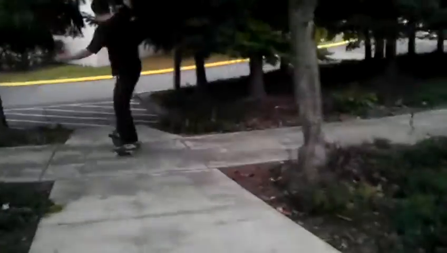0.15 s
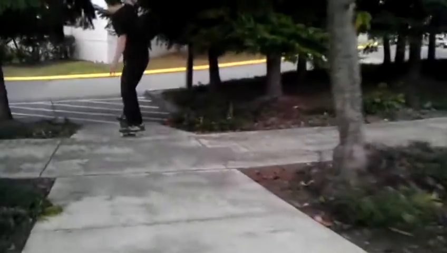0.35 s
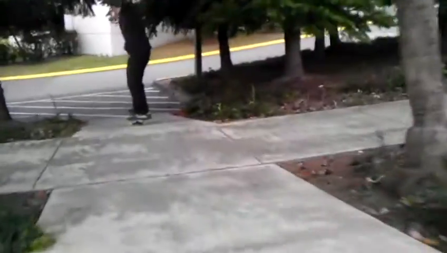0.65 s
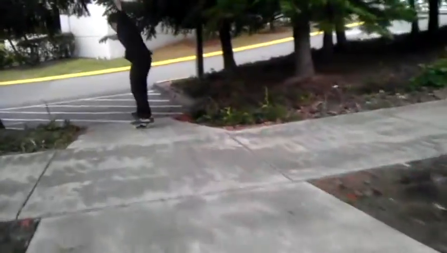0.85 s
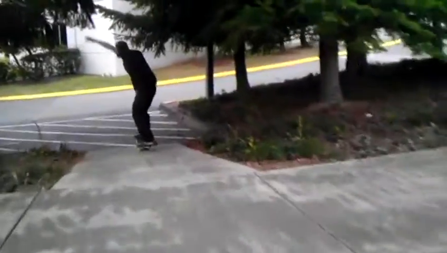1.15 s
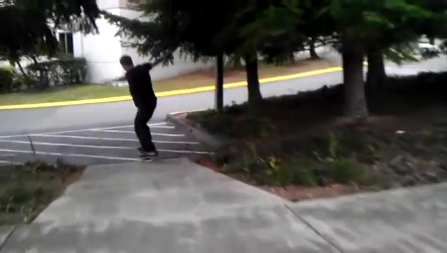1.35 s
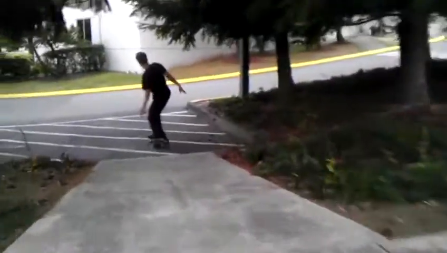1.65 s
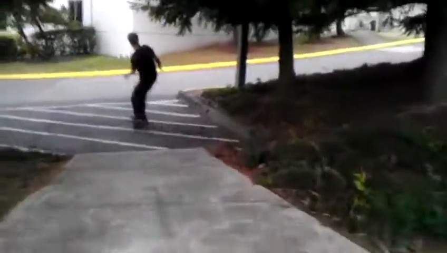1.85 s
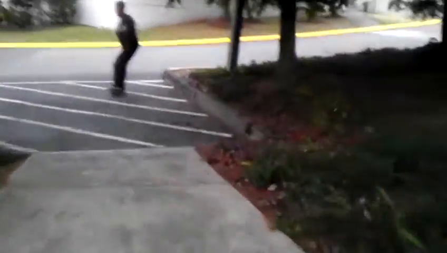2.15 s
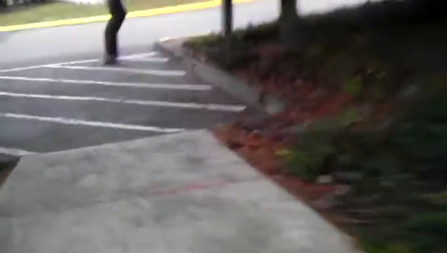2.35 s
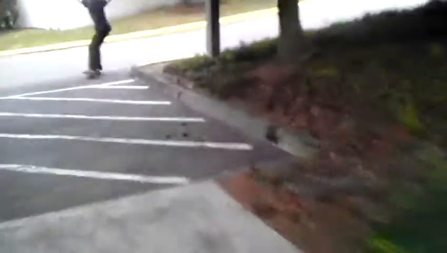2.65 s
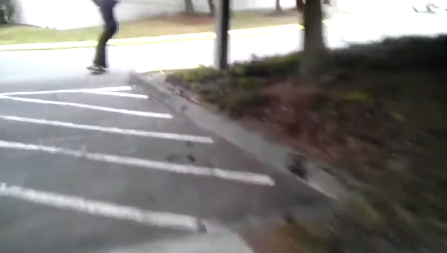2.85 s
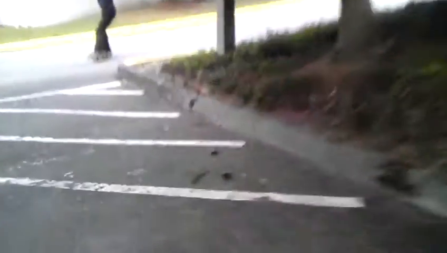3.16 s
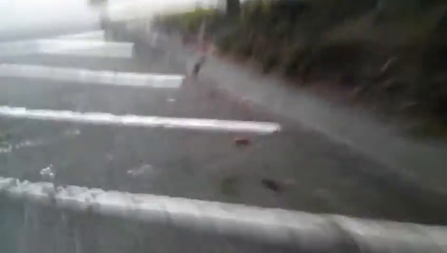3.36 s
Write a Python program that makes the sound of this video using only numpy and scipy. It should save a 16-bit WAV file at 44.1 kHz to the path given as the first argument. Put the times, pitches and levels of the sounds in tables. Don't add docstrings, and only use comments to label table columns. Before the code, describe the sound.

A skateboard rattles and hisses along concrete outdoors, with loud distorted clacks at each joint.

```python
import sys
import numpy as np
from scipy import signal
from scipy.fft import rfft, irfft
from scipy.io import wavfile
from scipy.ndimage import uniform_filter1d

SR = 44100
rng = np.random.default_rng(int(sys.argv[2]) if len(sys.argv) > 2 else 0)


def wav_out(sig):
    wavfile.write(sys.argv[1], SR, np.round(np.clip(np.atleast_2d(sig).T, -1, 1) * 32767).astype(np.int16))


def field_ratio(decibels):
    return 10 ** (np.asarray(decibels, dtype=float) / 20)


N = 154350

# f/Hz, width/Hz, level/dB
DECK_MODES = [(209, 90, -11), (339.6, 76, -7), (549, 50.6, 0), (690.4, 136.5, 3.5), (718.6, 156.5, 2.5),
              (947, 99, -7.5), (1263, 176, -13.5)]
# f/Hz, width/Hz, level/dB
WHEEL_MODES = [(2370, 130, 10), (3350, 560, 7), (4660, 1430, 2.5), (6700, 3900, -9.5), (11900, 3000, -25)]


def evened(x):
    return x / np.sqrt(np.mean(x ** 2) + 1e-20)


def read(points, hz):
    f, value = np.transpose(points)
    return np.interp(np.log(hz + 1), np.log(f + 1), value)


def curve(rows, column):
    rows = np.array(rows)
    return np.interp(np.arange(N) / SR, rows[:, 0], rows[:, column])


def add(mix, s, sound):
    part = mix[round(s * SR):][:len(sound)]
    part += sound[:len(part)]


def colour(x, points):
    gain = field_ratio(read(points, np.fft.rfftfreq(len(x), 1 / SR)))
    return irfft(rfft(x) * gain, len(x))


def ring(x, modes):
    out = 0
    for k, (hz, width, db) in enumerate(modes):
        r = np.exp(-np.pi * width / SR)
        poles = [1, -2 * r * np.cos(2 * np.pi * hz / SR), r * r]
        out = out + (-1) ** k * field_ratio(db) * (1 - r) * signal.lfilter([1, 0, -1], poles, x)
    return out


def wander(seconds):
    width = max(int(seconds * SR), 2)
    once = uniform_filter1d(rng.standard_normal(N), width)
    return evened(uniform_filter1d(once, width))


def grit(per_s, spread_db, smooth):
    size = field_ratio(spread_db * np.minimum(rng.exponential(1, N), 4))
    struck = rng.random(N) < per_s / SR
    taps = size * struck * rng.choice([-1., 1.], N)
    return evened(taps) + smooth * rng.standard_normal(N)


def hum(x, width, db):
    # t/s, f/Hz
    flex = [(0, 534), (.3, 567), (.7, 529), (1.0, 544), (1.3, 574), (1.55, 508), (1.75, 546), (2.1, 505),
            (2.5, 543), (3.0, 540), (3.3, 538), (3.45, 650), (3.5, 625)]
    hz = curve(flex, 1) * (1 + .03 * wander(.02))
    turn = np.exp(2j * np.pi * np.cumsum(hz) / SR)
    r = np.exp(-np.pi * width / SR)
    swing = turn * signal.lfilter([1 - r], [1, -r], x / turn)
    return field_ratio(db + wander(0.09)) * 2 * swing.real


def rolling(lumps):
    # t/s, level/dB
    load = [(0, -19), (.2, -23), (.445, -17), (.47, -15), (.62, -18), (.78, -16.5), (1.0, -20),
            (1.18, -17.5), (1.3, -20), (1.6, -18.5), (1.78, -22.5), (1.88, -29.5), (2.2, -24.5),
            (2.36, -22), (2.66, -17), (3.0, -18.5), (3.3, -13.5), (3.5, -24)]
    # t/s, sharpness/dB, finest share/dB
    sand = [(0, 3, 0), (.3, -2, 3), (.44, -7, -6), (.46, -4.5, -20), (.75, -1.5, 8.5), (1.0, -3, 2),
            (1.24, -9.5, -34), (1.3, -4.5, -16), (1.75, -1, 0), (1.9, 7, 3), (2.16, -6.5, -28),
            (2.21, -6, -37), (2.26, 2.5, -6), (2.6, -1, 6), (2.88, 3.5, -12), (3.06, 5, -6),
            (3.2, -4.5, -1), (3.5, 1, 12.5)]
    taps = grit(per_s=1500, spread_db=2.0, smooth=0.63) * field_ratio(lumps)
    main_mode = hum(taps, *DECK_MODES[2][1:])
    deck = evened(ring(taps, DECK_MODES[:2]) + main_mode - ring(taps, DECK_MODES[3:]))

    flicker_db = .6 * lumps + 1.8 * wander(.02)
    rub = .5 * taps + 5.4 * grit(per_s=3300, spread_db=4.0, smooth=0.43) * field_ratio(flicker_db)
    patchy_db = 1.5 * wander(.04)
    hiss = 0
    for k, mode in enumerate(WHEEL_MODES[:3]):
        hiss = hiss + (-1) ** k * ring(rub, [mode]) * field_ratio(2.74 * wander(0.04))
    hiss = hiss + ring(rub, WHEEL_MODES[3:]) * field_ratio(curve(sand, 2) + patchy_db)
    return field_ratio(curve(load, 1) + 4.5) * (deck + evened(hiss) * field_ratio(-14 + curve(sand, 1)))


def far_board(lumps):
    # t/s, level/dB
    far_level = [(0, -28), (.12, -39), (.45, -36), (.75, -35.5), (1.06, -38), (1.3, -37), (1.75, -37.5),
                 (1.88, -21), (2.0, -27), (2.2, -29), (2.45, -30.5), (2.64, -23.5), (2.73, -19),
                 (2.86, -31), (3.2, -31.5), (3.5, -33.5)]
    # f/Hz, density/dB per Hz
    roar = [(35, -63), (60, -29), (332, -9.5), (437, -19.5), (489, -2), (644, -10.5), (1800, -11.5),
            (11100, -81), (14000, -111)]
    rub = grit(per_s=1700, spread_db=7.5, smooth=1.5) * field_ratio(lumps)
    return field_ratio(curve(far_level, 1) + 9.5) * evened(colour(rub, roar))


def clack(start, db, settle_hz, contact_ms, crack_db, weight_db):
    # f/Hz, density/dB per Hz
    crack_colour = [(300, 2.5), (1500, 7.5), (3500, -4.5), (5200, -6), (6200, -9.5), (10000, -16),
                    (14000, -24)]
    jump_hz, glide_s, sag, ring_s = 900, 0.001996, 0.4, 0.0024
    thump_hz, thump_s, thump_db = 59.4, 0.012, -22
    overdrive_db, crack_rise_s = 9, .0005
    t = np.arange(0, .1, 1 / SR)
    noise = rng.standard_normal((2, len(t)))
    after = np.maximum(t - contact_ms / 1000, 0)

    hz = settle_hz * (1 - sag * np.minimum(after / 0.0083, 1)) + jump_hz * np.exp(-t / glide_s)
    wobble = 1 + 0.2 * evened(uniform_filter1d(noise[0], 40))
    knock = np.sin(2 * np.pi * np.cumsum(hz * wobble) / SR) * np.exp(-after / ring_s)

    rattle = ring(noise[1] * np.exp(-after / 0.0094), DECK_MODES)
    body = knock + .65 * rattle / abs(rattle).max()
    thud = field_ratio(-18.5) * np.sin(2 * np.pi * 210 * t) * np.exp(-after / 0.0045)
    thump = np.sin(2 * np.pi * thump_hz * after) * np.exp(-after / thump_s)
    thump = field_ratio(thump_db + weight_db) * thump

    shape = (0.73 + 0.38 * np.exp(-t / 0.00081)) * np.exp(-after / 0.0023)
    shape = shape * np.minimum(t / crack_rise_s, 1)
    crack = field_ratio(crack_db - 3.0) * evened(colour(noise[0], crack_colour)) * shape

    rise = np.minimum(t / 0.00074, 1)
    return start - .0005, field_ratio(db - 7.5 + overdrive_db) * rise * (body + thud + thump + crack)


def stone(start, db, hz, grit_db):
    t = np.arange(0, .06, 1 / SR)
    kick = rng.standard_normal(len(t)) * np.exp(-t / .004)
    body = ring(kick, DECK_MODES) + field_ratio(grit_db - 29.5) * ring(kick, WHEEL_MODES[:3])
    tone = np.sin(2 * np.pi * hz * t) * np.exp(-t / .005) * np.minimum(t / .002, 1)
    return start - .001, field_ratio(db + 1.0) * (0.4 * body / abs(body).max() + 0.8 * tone)


def boards(near_lumps, far_lumps):
    # t/s, strength/dB, settling f/Hz, contact/ms, crack/dB
    joints = [(0.048, -4, 1003, 4.6, -3), (.336, 3, 611.5, 8, -2.5), (0.456, -3.5, 630, 5.8, -5),
              (.519, 8.5, 900, 2.63, -0.5), (.929, -2, 479, 6.1, -3), (0.9372, -3, 735, 1.9, 2),
              (1.079, 1, 530, 3.44, 0), (1.399, -3.5, 565, 9.4, -2.5), (1.5425, 0, 595, 4.5, -3),
              (1.794, -10.5, 580, 12, -8), (1.809, 4.5, 574, 6.2, -4), (1.934, 3, 589, 5.5, -7),
              (2.302, -1.5, 545, 8.8, -0.5), (2.444, 6.5, 591, 5.7, -1.5), (2.709, -4, 594, 6.5, -6),
              (2.739, 5, 622, 6.5, -3), (2.869, 1.5, 516, 6.6, -6.5), (3.128, -4, 1032, 5.9, -1),
              (3.229, 2, 617, 7.5, -4), (3.318, 1, 597, 3.8, -7)]
    low_thumps = [-15, 6, -8, -21, -2, -6, 0, -7, 15.5, -6, 3, -4, 10, 11.5, -4, 11, -13, 2, 11, -17]
    # t/s, strength/dB, f/Hz, grit/dB
    stones = [(.199, -3.5, 224, 7), (.267, -12, 870, -14), (.287, -8, 497, -3), (.309, -9, 510, -2),
              (.468, -2.5, 900, 1), (.69, -3, 516, -5), (.755, -2.5, 485, -14), (2.717, -5, 1500, 5),
              (1.145, -19, 576, 8), (1.195, -4, 624, 1), (1.265, -0.5, 563, -1), (1.315, -4.5, 920, 6),
              (1.349, -17, 610, 0), (1.466, -2, 626, -13), (1.521, -7, 1020, 0), (1.537, -2, 1075, -5),
              (1.581, -10, 517, 9), (1.694, -3.5, 555, -6), (1.847, -7, 1500, 0), (1.974, -14, 1200, -5),
              (2.108, -4.5, 900, -13), (2.21, -10, 700, -5), (2.262, -28, 550, 3), (2.535, -3, 900, 7),
              (2.573, -3, 650, -3), (2.591, -4.5, 536, 11), (2.626, -8, 630, 6), (2.657, -10, 525, -1),
              (2.722, 3, 900, 4), (2.752, -13, 600, 5), (2.78, -9, 450, 0), (2.801, -0.5, 540, -7),
              (2.82, -2, 513, -4), (2.96, 2, 970, 4.5), (2.997, -4, 940, 5), (3.019, -9, 544, 6),
              (3.097, -15, 830, 0), (3.107, -3, 550, -6), (3.137, -5, 490, -6), (3.192, -23, 560, 5),
              (3.221, -11, 500, 7), (3.283, -17, 680, -5), (3.296, 3, 680, 0), (3.352, 4, 1028, -2),
              (3.385, 4.5, 670, -2), (3.437, -5, 670, -9)]
    mix = rolling(near_lumps) + far_board(far_lumps)
    for row, weight_db in zip(joints, low_thumps):
        add(mix, *clack(*row, weight_db))
    for row in stones:
        add(mix, *stone(*row))
    return mix


def ports(mid, other):
    # f/Hz, correlation
    likeness = [(60, 0.66), (180, 0.98), (530, 1), (1570, 0.95), (4680, 0.24), (13900, 0.054)]
    # f/Hz, level/dB
    port_lean = [(60, 0), (800, 0), (1240, -1), (2260, 1), (4140, 3.5), (7590, -4.5), (13900, -4)]
    hz = np.fft.rfftfreq(N, 1 / SR)
    same = np.clip(read(likeness, hz), .02, 1)
    apart = np.sqrt((1 - same) / (1 + same))
    lean = field_ratio(read(port_lean, hz) / 2)
    a = rfft(mid)
    b = 1j * rfft(other) * apart
    return irfft(np.array([(a + b) * lean, (a - b) / lean]) / np.sqrt(1 + apart ** 2), N)


def outdoor_air():
    spectrum = [(60, -45), (1500, -37), (5000, -71), (14000, -81)]  # f/Hz, level/dB
    return np.array([colour(rng.standard_normal(N), spectrum) for _ in "LR"])


def scene():
    near = 1.1 * wander(.005) + .2 * wander(.03)
    far = 1.5 * wander(.01) + .6 * wander(.04)
    return ports(boards(near, far), boards(near, far)) + outdoor_air()


def thin_treble(x):
    # from t/s, top f/Hz
    reach = [(0, 13900), (.065, 11700), (.125, 13600), (.16, 11200), (.195, 13800), (.3, 12300),
             (.35, 11100), (.45, 14200), (.53, 11800), (.845, 11200), (1.0, 9800), (1.054, 13200),
             (1.09, 11100), (1.21, 9100), (1.275, 11800), (1.34, 10500), (1.41, 9000), (1.445, 11100),
             (1.51, 11800), (1.56, 11100), (2.06, 8300), (2.1, 11100), (2.18, 5900), (2.24, 11100),
             (2.36, 12300), (2.46, 11100), (2.76, 12500), (3.26, 11700), (3.33, 12500), (3.42, 13300)]
    # f/Hz, spreads of chance
    spare = [(4500, 5), (5500, 1.9), (9000, 1.7), (10000, 1.0), (11000, 1.4), (14000, .7), (14500, .3),
             (14700, -4)]
    loud_db, streaks_db = -6.5, 3.0
    hz, t, z = signal.stft(x, SR, nperseg=512)
    hz = hz[:, None]
    loud = 10 * np.log10((abs(z) ** 2).mean(0).sum(0) * 4 / 3 + 1e-20) > loud_db

    luck, streaks = rng.standard_normal((2, *z.shape[1:]))
    luck = uniform_filter1d(luck, size=4, axis=0)
    luck = evened(uniform_filter1d(luck, size=10, axis=1))
    streaks = evened(uniform_filter1d(streaks, size=8, axis=1)) * np.clip(hz / 6000, 0, 1)

    since, top_hz = np.transpose(reach)
    within = hz < top_hz[np.searchsorted(since, t, "right") - 1]
    keep = np.clip(2 * (luck + read(spare, hz)), 0, 1) * within * field_ratio(streaks_db * streaks)
    keep = np.where(loud, hz < 14600, keep)
    return signal.istft(z * keep, SR, nperseg=512)[1][:, :N]


def band_limit(x):
    return signal.sosfilt(signal.butter(12, 14490, fs=SR, output="sos"), x)


def record(dry):
    # f/Hz, level/dB
    mic = [(4700, 0), (5150, -1), (5500, -7), (6600, -6), (8000, -3), (10500, -4), (14000, -11)]
    bass_cut = signal.butter(2, 130, "high", fs=SR, output="sos")
    x = signal.sosfilt(bass_cut, [colour(port, mic) for port in dry])

    power_db = 10 * np.log10(signal.lfilter([.004], [1, -.996], (x ** 2).mean(0)) + 1e-12)
    fall = np.arange(N) * 60. / SR
    held_db = np.maximum.accumulate(power_db + fall) - fall
    over_db = np.maximum(held_db + 13.5, 0)
    lag = np.exp(-1 / (0.015 * SR))
    duck_db = 0.58 * signal.lfilter([1 - lag], [1, -lag], over_db)

    x = np.clip(x / field_ratio(duck_db), -1, 1)
    x = signal.sosfilt(signal.butter(2, 48, "high", fs=SR, output="sos"), x)
    mix = np.clip(thin_treble(x), -1, 1)
    return band_limit(mix)


dry = scene()
out = record(dry)
wav_out(out)
```